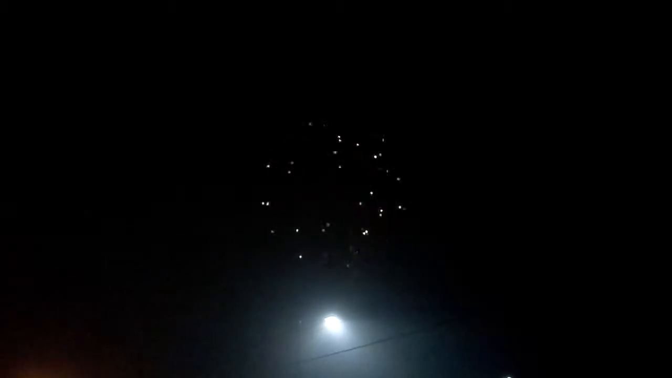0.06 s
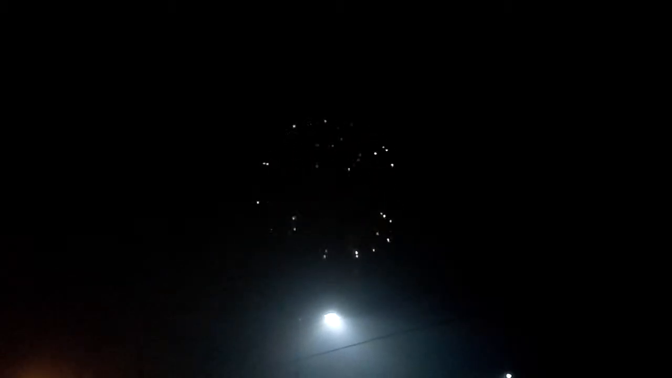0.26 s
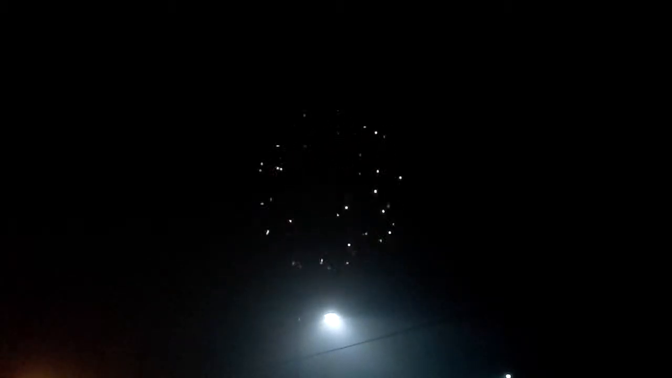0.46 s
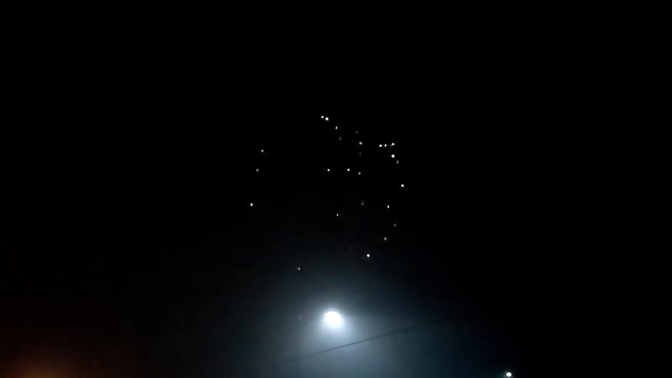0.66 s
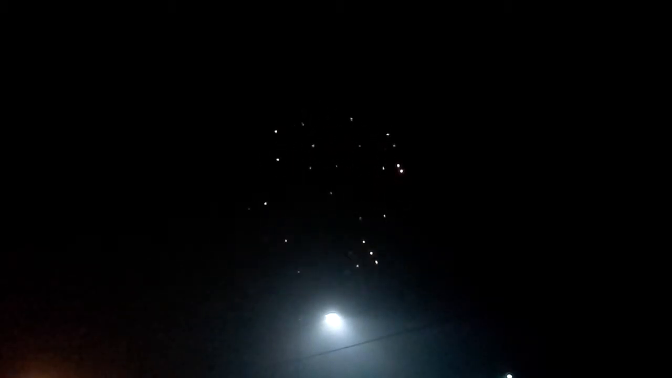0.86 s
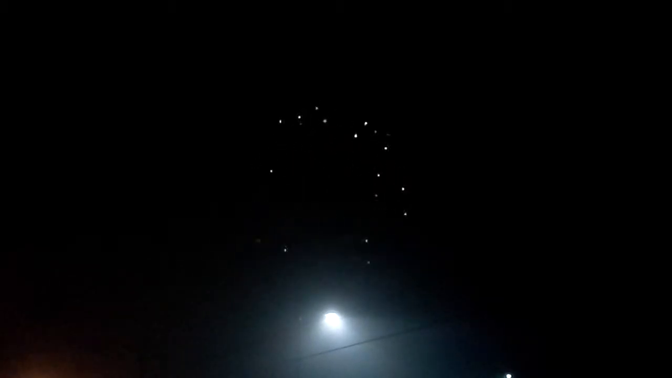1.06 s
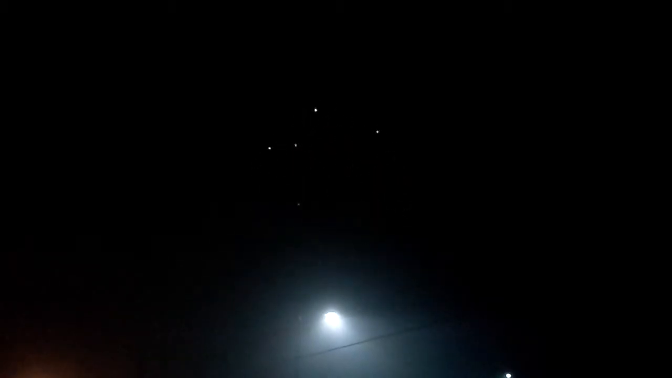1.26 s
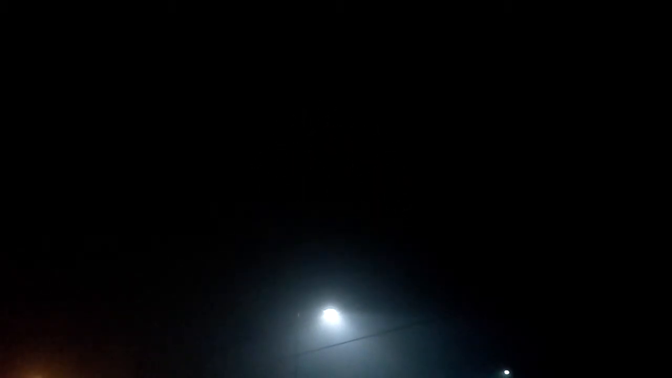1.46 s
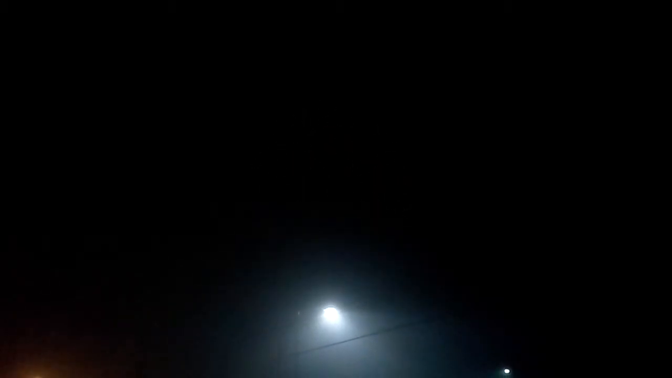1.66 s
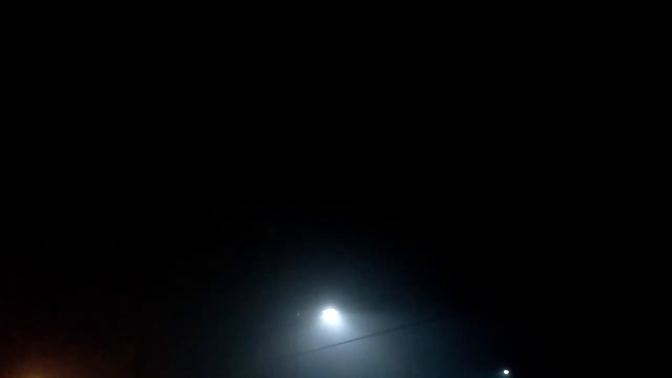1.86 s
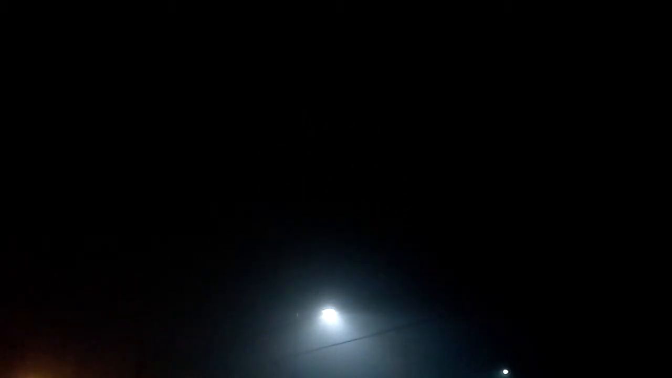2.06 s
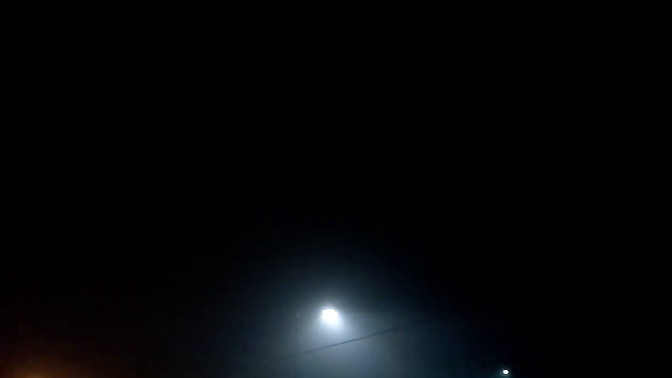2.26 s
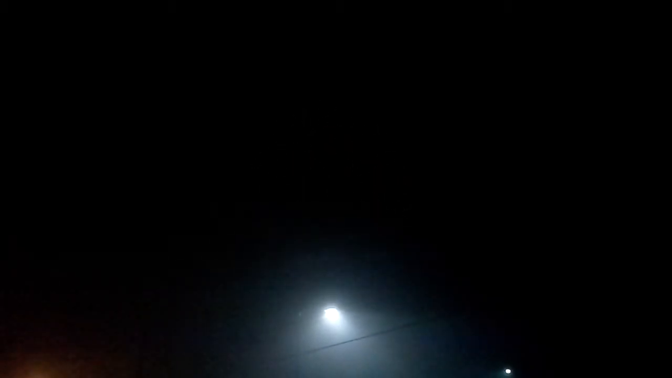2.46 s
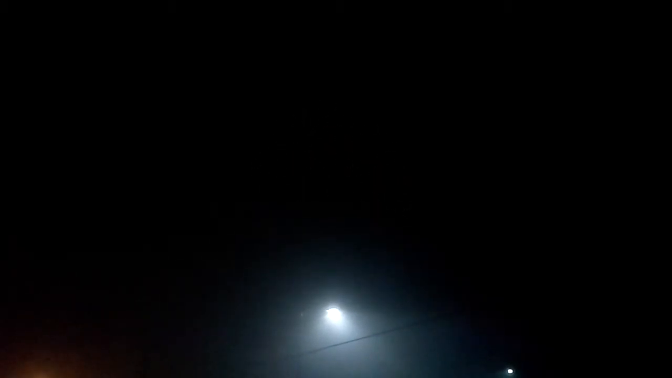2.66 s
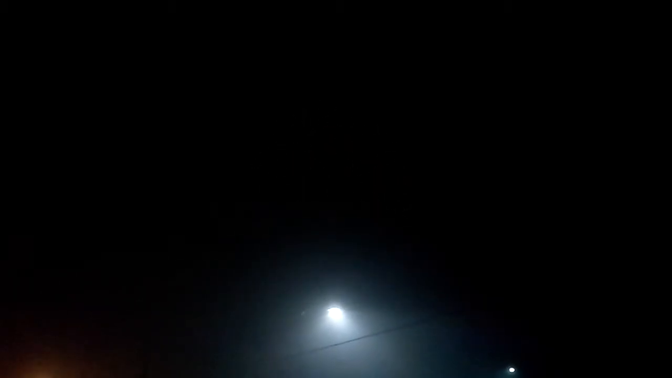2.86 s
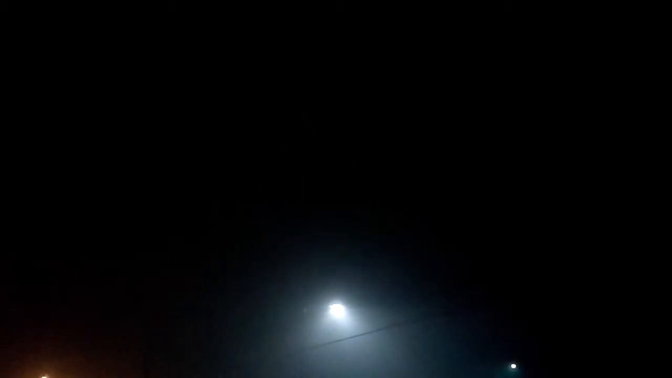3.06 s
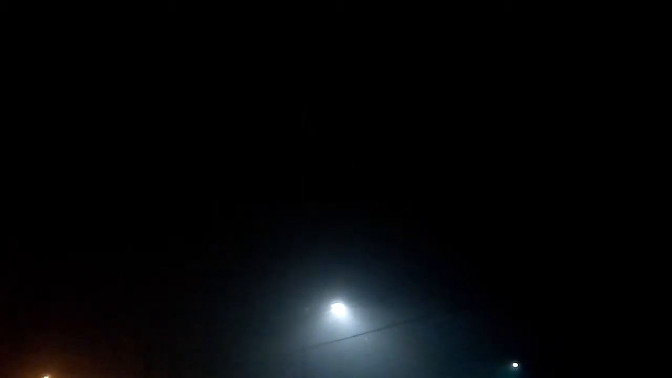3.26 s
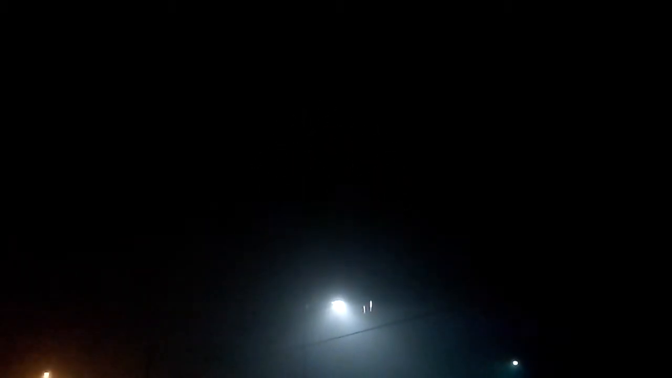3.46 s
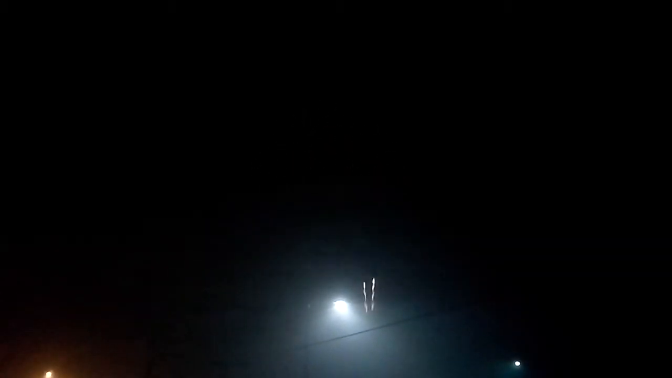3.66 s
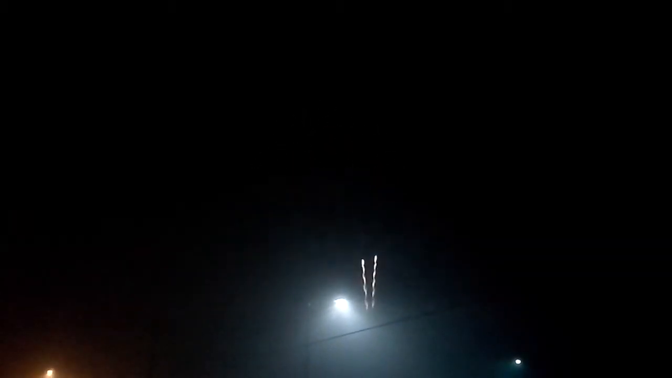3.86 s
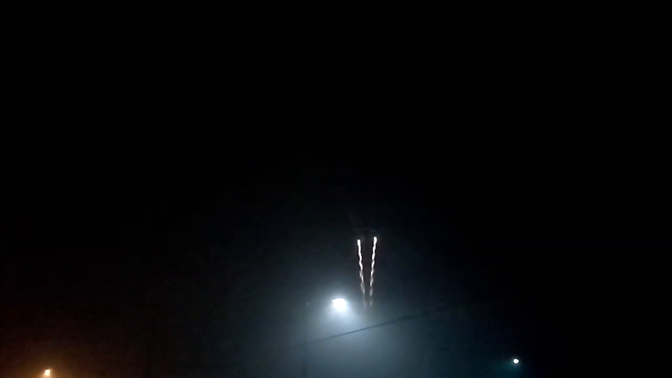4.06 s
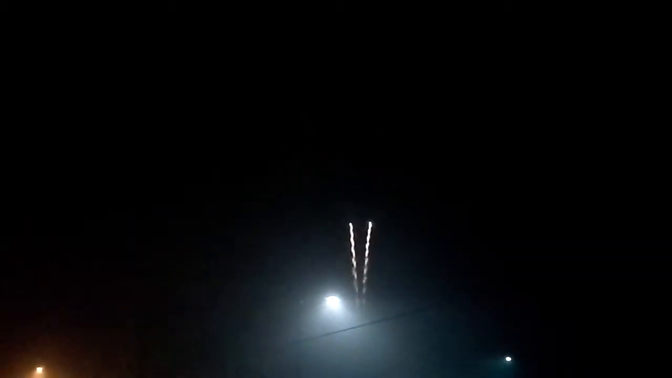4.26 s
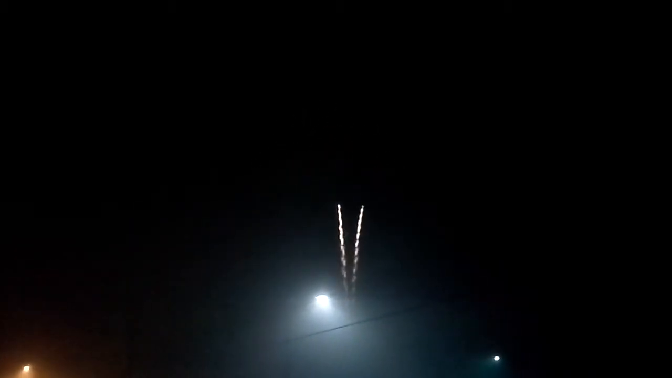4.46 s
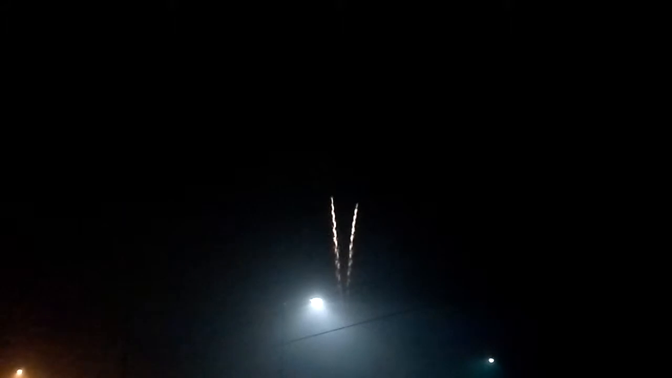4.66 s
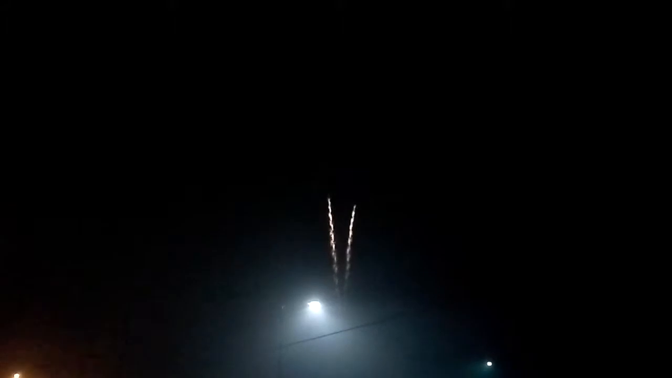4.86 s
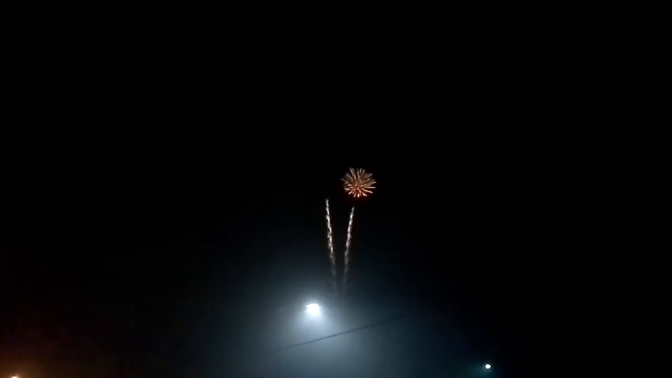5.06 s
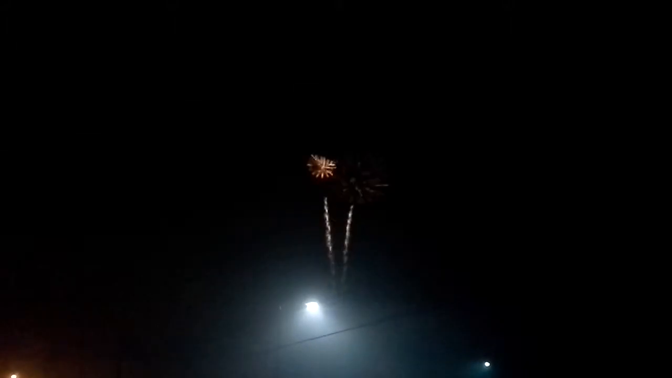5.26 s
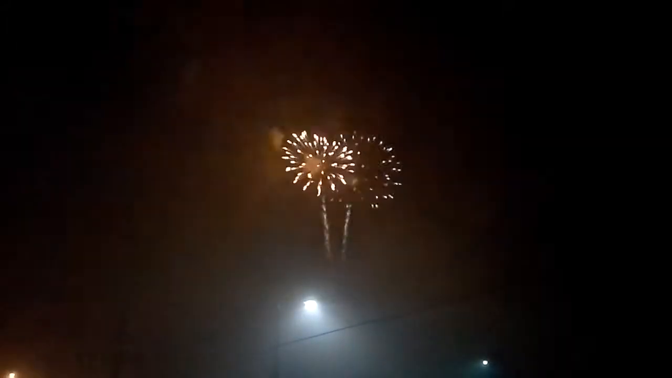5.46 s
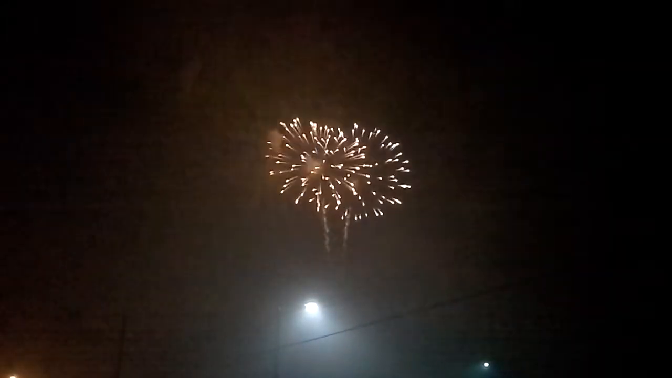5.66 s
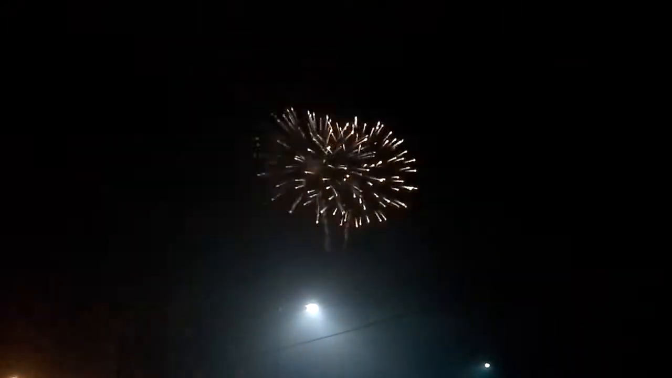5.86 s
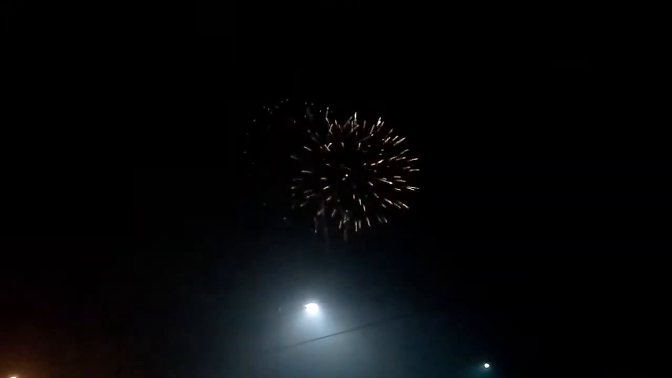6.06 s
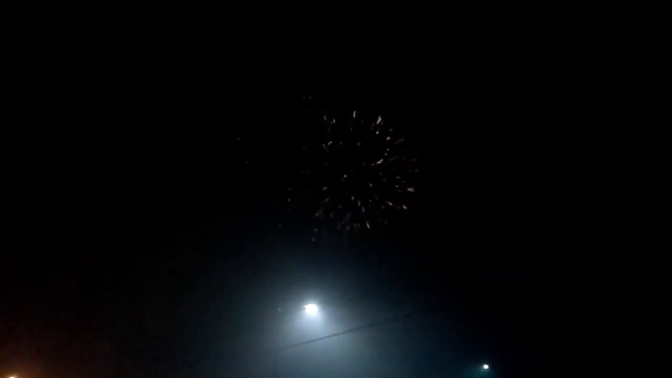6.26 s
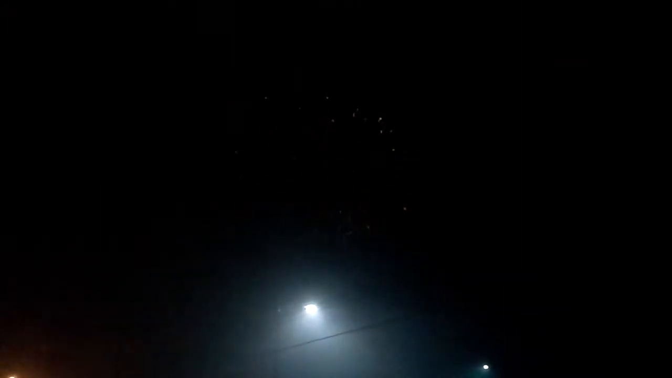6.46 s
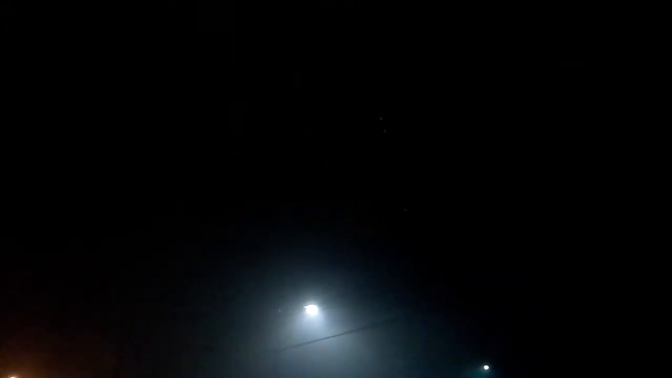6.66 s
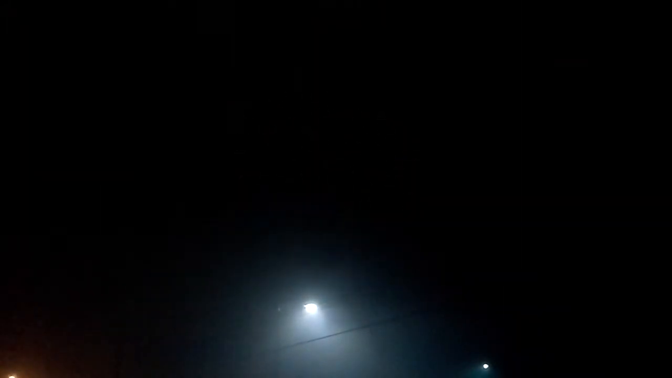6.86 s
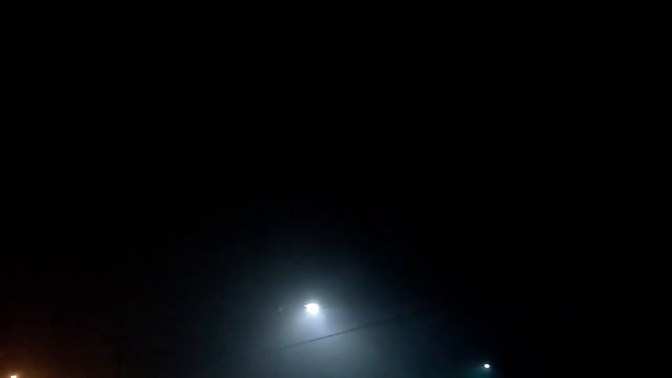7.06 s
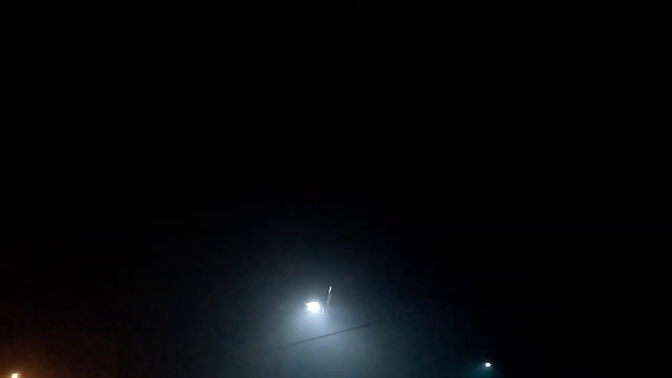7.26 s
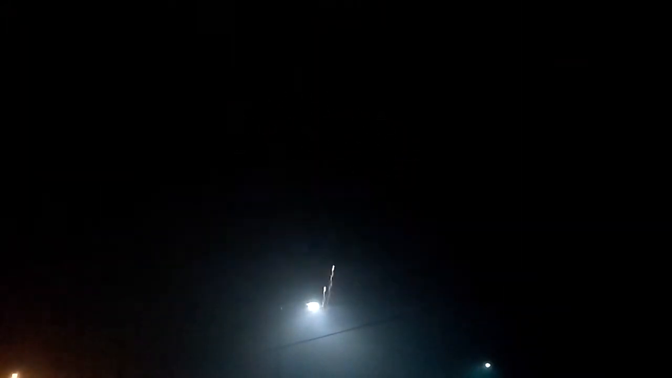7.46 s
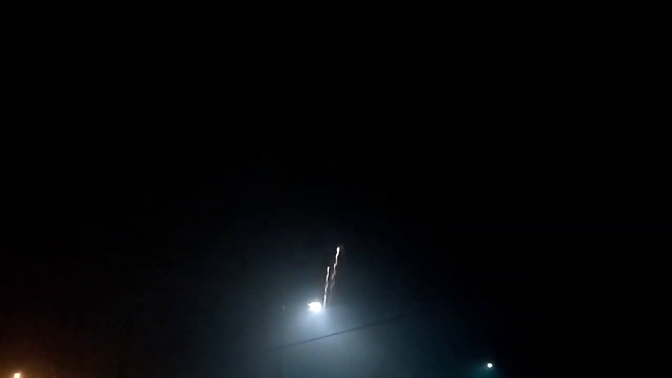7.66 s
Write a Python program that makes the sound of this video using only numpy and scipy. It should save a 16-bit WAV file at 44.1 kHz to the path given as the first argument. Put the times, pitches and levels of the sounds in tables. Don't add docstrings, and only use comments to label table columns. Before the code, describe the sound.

A mono, handheld-like capture of fireworks: first a fading echo tail with slaps from house fronts, then quiet insects and distant traffic. Hollow, woody launch thumps come as a quick pair, with short reflections. After a pause, two very loud, distorted bangs about a quarter second apart swamp everything and roll away in rumbling echoes. Later thumps, one ringing like a tube, punctuate the decay.

```python
import sys
import numpy as np
from scipy import signal
from scipy.fft import rfft, irfft
from scipy.io import wavfile
from scipy.ndimage import uniform_filter1d

SR = 44100
rng = np.random.default_rng(int(sys.argv[2]) if len(sys.argv) > 2 else 0)


def volts(x):
    e = np.asarray(x, float) / 20
    return 10 ** e


def inscribe(sig):
    pcm = np.round(np.clip(np.atleast_2d(sig).T, -1, 1) * 32767)
    wavfile.write(sys.argv[1], SR, pcm.astype(np.int16))


N = 340011
T = np.arange(N) / SR
HZ = np.fft.rfftfreq(N, 1 / SR)

# t/s, shock level/dB, boom level/dB, boom f/Hz
BURSTS = [
    (5.7193, 20, 15, 247),
    (5.9809, 20, 17, 243),
]
# t/s, shock level/dB, tube ring level/dB, overtone level/dB, overtone f/Hz
LAUNCHES = [
    (3.4158, -13, -30, -24, 4600),
    (3.4198, -1, -3, -5, 2930),
    (3.4325, -2, -9, -12, 2220),
    (7.0811, -2, -9, -18, 2200),
    (7.1680, -15, -16, -30, 1400),
    (7.1704, -3.5, 0, -5, 1450),
    (7.6255, -16, -24, -16, 1400),
    (7.6280, -1, -20, -6, 1400),
]
# f/Hz, level/dB per Hz
WALL_COLOUR = [(35, -30), (60, -4), (142, -17), (482, -29), (858, -3), (1370, -5), (1670, -8), (1990, -10),
               (2430, -4.5), (3040, -31), (4630, -38), (9200, -84), (12000, -94), (15600, -115),
               (22000, -120)]
# t/s, peak level/dB, f/Hz, length/cycles
SLAPS = [(0.006, -7, 305, 1.3), (0.242, -18.5, 243, 2), (0.408, -15.5, 307, 3.1), (0.658, -13, 125, 2.7),
         (0.661, -15.5, 406, 3.3), (0.938, -17, 126, 2.1), (1.643, -19, 250, 3), (1.945, -19.5, 275, 3),
         (2.380, -20, 272, 4.5), (2.775, -21.5, 270, 2.6), (3.055, -26, 287, 5.2), (3.790, -30, 4000, 30),
         (3.820, -24, 695, 4.4), (4.130, -25.5, 1640, 13), (4.143, -24, 1600, 10.5), (5.878, -4, 302, 2.3),
         (5.917, -10.5, 253, 2.5), (5.963, -9, 240, 3.2), (5.9765, -1, 270, 1.2), (6.015, -3, 216, 3.7),
         (6.05, -10.5, 225, 8), (6.14, -20.5, 440, 14), (6.165, -11, 209, 7.6), (6.255, -18.5, 202, 6.8),
         (6.34, -20, 246, 13), (4.062, -35, 1990, 14), (4.130, -34, 2380, 21), (4.143, -36, 2390, 12),
         (7.463, -33, 3200, 30), (7.551, -32, 3400, 34)]
ROLL_EDGES_HZ = [150, 450, 1100, 2600]
# f/Hz, level/dB per Hz
ROLL_COLOUR = [(30, -64), (60, -11.5), (126, -2.5), (215, -3.5), (290, 0.5), (430, -12), (510, -12),
               (790, -8.5), (1070, -15), (2000, -20), (3250, -22.5), (4650, -15.5), (6500, -35.5),
               (9500, -49), (15400, -110)]
# f/Hz, level/dB per Hz
TOP_COLOUR = [(4500, -30), (6500, -6), (8000, -7), (13300, -11.5), (15400, -54)]
BAND_HZ = [90, 270, 750, 1700, 4500, 8500]
# near level/dB, near fall/(dB/s), far level/dB, far fall/(dB/s)
SHELL_ECHOES = [
    (-21, 53, -9, 1.5),
    (-1, 43, 1, 0.9),
    (-2.5, 81, 0, 3),
    (-6.5, 81, -2.5, 6),
    (-5.5, 74, -4.5, 8.5),
    (-20, 67.5, -27, 35),
]
# near level/dB, near fall/(dB/s), far level/dB, far fall/(dB/s)
MORTAR_ECHOES = [
    (-14, 67, -9.5, 6.8),
    (-8, 99, -9, 7.1),
    (-1, 135, 0, 13),
    (-6.5, 89, -3.5, 15.8),
    (-2.5, 102, -9.5, 9.3),
    (-34, 85, -29.5, 40),
]
# t/s, near level/dB, far level/dB, extra bass level/dB, extra treble level/dB
SHELL_ROLLS = [
    (-.05, -33, -28, 1.5, 1),
    (5.722, -13.5, -29.5, -4, 3),
    (5.984, -12, -34.5, -1, 1.5),
]
# t/s, near level/dB, far level/dB, extra bass level/dB, extra treble level/dB
MORTAR_ROLLS = [
    (3.421, -19, -31.5, 1.5, -3),
    (7.083, -20.5, -46, 6, -7.5),
    (7.172, -23, -32.5, -1, -6),
    (7.63, -27.5, -34, 0, -6),
]
# t/s, half length/s, level/dB, centre f/Hz
SWELLS = [(-0.002, 0.048, -22, 800), (.35, 0.45, -33.5, 90), (.72, 0.058, -27, 110),
          (0.696, 0.091, -27.5, 450), (.42, 0.054, -30, 1090), (0.777, 0.043, -33.5, 2200),
          (3.412, 0.016, -34, 2520), (3.666, 0.042, -34, 100), (3.69, .03, -35, 1100),
          (3.803, 0.034, -35, 3000), (3.814, 0.04, -32, 750), (3.943, 0.054, -35, 270),
          (4.066, 0.015, -48, 2000), (4.157, 0.13, -50, 1700), (5.806, 0.049, -30, 131),
          (5.883, 0.065, -26, 4500), (6.115, 0.039, -34, 4500), (6.556, 0.046, -37, 900),
          (6.893, 0.067, -32.5, 330), (7.27, 0.045, -31, 750), (7.455, 0.15, -36, 895),
          (5.802, 0.036, -21, 270), (6.17, 0.027, -28, 330)]
# t/s, level/dB
CRICKET = [
    (0, -46),
    (.7, -45.5),
    (1.1, -46),
    (2.4, -44.5),
    (4.2, -45.5),
    (4.9, -47.5),
    (5.7, -47.5),
    (6.6, -46),
    (7.71, -46),
]
# start t/s, length/s, level/dB, depth of gaps between syllables/dB
KATYDID = [(1.012, 0.31, -49.5, -7), (1.5, 0.45, -45, 16), (1.94, 0.18, -48, 8), (2.147, .3, -43.5, 20),
           (2.573, .31, -52, 12), (2.973, 0.28, -48.5, -2), (3.254, 0.2, -43, 2), (4.202, .3, -45.5, 13),
           (4.74, .3, -52, 9), (5.063, 0.2, -46, 10), (5.278, 0.28, -45, 1), (5.57, 0.11, -45.5, 3)]
# f/Hz, width/Hz, level/dB
KATYDID_BODY = [(4150, 230, -9.5), (4453, 390, -2.5), (4650, 120, -2.5)]
# f/Hz, level/dB per Hz
NIGHT_COLOUR = [(24, -35), (60, -13), (250, -1.5), (400, -15), (840, -15.5), (2000, -23.5), (3300, -25),
                (5000, -23), (7000, -31.5), (14300, -29), (15000, -46)]
# f/Hz, width/Hz, level/dB
CHORUS = [(5690, 300, -51), (5893, 230, -52), (8970, 570, -64)]
# f/Hz, level/dB
LOSS_BELOW_MIDDLE = [(6200, -28), (7100, -4.5), (9000, 2.5), (14300, 1.5), (15000, 4)]
# f/Hz, level/dB
LOSS_BELOW_NEIGHBOURS = [(6300, -20), (7300, 1), (9000, 0), (10000, 3)]


def evened(x):
    return x / np.sqrt(np.mean(x ** 2) + 1e-20)


def read(points, hz):
    f, value = np.transpose(points)
    return np.interp(np.log(hz + 1), np.log(f + 1), value)


def add(mix, s, sound):
    part = mix[round(s * SR):][:len(sound)]
    part += sound[:len(part)]


def resonate(x, hz, width):
    turn = np.exp(2j * np.pi * hz * np.arange(len(x)) / SR)
    r = np.exp(-np.pi * width / SR)
    smooth = signal.lfilter([(1 - r) ** 2], [1, -2 * r, r * r], x / turn)
    return 2 * (turn * smooth).real


def wander(seconds):
    size = max(round(seconds * SR), 2)
    drift = uniform_filter1d(rng.standard_normal(N), size)
    return evened(uniform_filter1d(drift, size))


def shock(t, seconds):
    u = t / seconds
    return (1 - u) * np.exp(-u) * np.minimum(t / 0.00005, 1)


def ring(t, hz, t60, rise):
    return np.sin(2 * np.pi * hz * t) * volts(-60 * t / t60) * (1 - np.exp(-t / rise))


def burst(shock_db, boom_db, hz):
    t = np.arange(round(.08 * SR)) / SR
    crack = shock(t, .0006)
    add(crack, .0015, 1.0 * shock(t, .00025))
    add(crack, .0018, .9 * shock(t, .00012))
    turns = np.maximum(hz * t + .07 - 1.3 * np.exp(-t / .0014), 0)
    boom = -np.sin(2 * np.pi * turns) * volts(-20 * (t / .013) ** 3)
    return volts(shock_db) * crack + volts(boom_db) * boom


def launch(shock_db, tube_db, over_db, over_hz):
    t = np.arange(round(.15 * SR)) / SR
    walls_db = shock_db - 11.5
    taps = rng.standard_normal((2, len(t))) * (rng.random((2, len(t))) < 9000 / SR)
    colour = volts(read(WALL_COLOUR, np.fft.rfftfreq(len(t), 1 / SR)))
    walls = evened(irfft(rfft(taps[0]) * colour, len(t)))
    walls *= volts(-60 * t / 0.11) * np.minimum(t / 0.00067, 1)
    late = evened(resonate(taps[1], 4430, 1100)) * volts(-60 * t / 0.085)
    pulse = np.convolve(shock(t, .0003), np.hanning(16))[:len(t)]
    out = volts(shock_db) * pulse / pulse.max() + volts(walls_db) * walls
    out += volts(tube_db) * ring(t, 775, .034, .0006)
    out += volts(over_db) * ring(t, over_hz, .028, .0003)
    add(out, .003, volts(walls_db + 12.5) * ring(t, 113.0, 0.022, 0.0017))
    add(out, .006, volts(walls_db - 10.5) * late)
    return out


def slap(db, hz, cycles):
    t = np.arange(round(cycles / hz * SR)) / SR
    return volts(db) * np.sin(2 * np.pi * hz * t) * np.hanning(len(t))


def echo_levels():
    rise_s, far_sag_db, swell_db_per_octave = 0.004, 0.554, 7
    t = T[::64]
    power = np.zeros((len(BAND_HZ), len(t)))
    for rolls, echoes in ((SHELL_ROLLS, SHELL_ECHOES), (MORTAR_ROLLS, MORTAR_ECHOES)):
        near, near_fall, far, far_fall = np.transpose(echoes)[:, :, None]
        for s, near_db, far_db, bass_db, treble_db in rolls:
            age = np.maximum(t - s, 0)
            tone_db = np.array([bass_db, 0, 0, 0, treble_db, treble_db])[:, None]
            near_power = volts(near_db + near - near_fall * age) ** 2
            far_power = volts(far_db + far - far_fall * age - far_sag_db * age ** 2) ** 2
            power += (near_power + far_power) * (volts(tone_db) * np.minimum(age / rise_s, 1)) ** 2
    for s, half, db, hz in SWELLS:
        octaves_off = abs(np.log2(np.array(BAND_HZ) / hz))[:-1, None]
        swell = np.exp(-((t - s) / half) ** 2)
        power[:-1] += volts(db - swell_db_per_octave * octaves_off) ** 2 * swell
    return [np.interp(T, t, np.sqrt(p)) for p in power]


def roll():
    sizes = volts(1.5 * np.minimum(rng.exponential(1, N), 4))
    echoes = rng.standard_normal(N) * sizes * (rng.random(N) < 12000 / SR)
    spectrum = rfft(echoes * volts(.5 * wander(0.012)))
    band_of = np.searchsorted(ROLL_EDGES_HZ, HZ)
    colour = volts(read(ROLL_COLOUR, HZ))
    colours = [colour * (band_of == k) for k in range(len(ROLL_EDGES_HZ) + 1)]
    colours.append(volts(read(TOP_COLOUR, HZ)))
    return sum(level * evened(irfft(spectrum * band, N)) for level, band in zip(echo_levels(), colours))


def cricket():
    tone_hz, strokes_per_s = 2815, 59.1
    strokes = T * strokes_per_s + 1.03 + 0.027 * wander(0.22)
    within = strokes % 1
    slip = np.cumsum(rng.standard_normal(600))[np.abs(strokes).astype(int)] * 1.59
    tone = np.sin(2 * np.pi * tone_hz * T + slip - 6.0 * within ** 2)
    song = tone * np.sin(np.pi * np.minimum(within / .7, 1))
    garden = rng.standard_normal(4000) * volts(-60 * np.arange(4000) / SR / 0.12)
    song = evened(song) + volts(-6.5) * evened(signal.oaconvolve(song, garden)[:N])
    level_db = np.interp(T, *np.transpose(CRICKET)) + 1 * wander(0.0023)
    return volts(level_db) * evened(song)


def katydid():
    syllable_s, sounding, swell_db = .114, 0.65, 3.5
    teeth = np.cumsum(430 * volts(0.79 * wander(0.0044))) / SR
    clicks = np.diff(np.floor(teeth), prepend=0) * (1 + 0.28 * rng.standard_normal(N))
    clicks += 0.072 * rng.standard_normal(N)
    rasp = evened(sum(volts(db) * resonate(clicks, hz, width) for hz, width, db in KATYDID_BODY))
    level = np.zeros(N)
    for start, length, db, gap_db in KATYDID:
        stroke = np.arange(0, length, 1 / SR) / syllable_s % 1
        growth_db = swell_db * (stroke / sounding - .5)
        add(level, start, volts(db + np.where(stroke < sounding, growth_db, -gap_db)))
    return uniform_filter1d(level, size=1200) * rasp


def night():
    air = evened(irfft(rfft(rng.standard_normal(N)) * volts(read(NIGHT_COLOUR, HZ)), N))
    out = volts(-43.5) * air
    for hz, width, db in CHORUS:
        shimmer_db = 1 * wander(0.011) + 1.0 * wander(0.05)
        out += volts(db + shimmer_db) * evened(resonate(rng.standard_normal(N), hz, width))
    return out


def scene():
    bangs = np.zeros(N)
    for table, source, lead in ((BURSTS, burst, 0), (LAUNCHES, launch, .0003), (SLAPS, slap, .004)):
        for s, *row in table:
            add(bangs, s - lead, source(*row))
    mono = bangs + roll() + cricket() + katydid() + night()
    return np.array([mono, mono])


def thin_treble(x):
    hz, t, z = signal.stft(x, SR, nperseg=2048)
    power = abs(z) ** 2
    line_db = 10 * np.log10(power + 1e-20)
    middle_db = 10 * np.log10(power[(hz > 500) & (hz < 5000)].sum(0) + 1e-20)
    step_db = np.clip(-82.0 + 1.22 * (uniform_filter1d(middle_db, size=3) + 35), -87, -63)
    step_db = step_db + read(LOSS_BELOW_MIDDLE, hz)[:, None]
    step_db += 2.5 * rng.standard_normal((len(t), 40)).T[(hz / 600).astype(int)]
    around_db = 10 * np.log10(uniform_filter1d(power, size=24, axis=0) + 1e-20)
    step_db = np.maximum(step_db, around_db + read(LOSS_BELOW_NEIGHBOURS, hz)[:, None])
    steady = np.diff(middle_db, prepend=0) < 9
    lost = (line_db < step_db) & (hz[:, None] > 5500) & steady
    return x - signal.istft(z * lost, SR, nperseg=2048)[1][:N]


def roll_off(x):
    return signal.sosfilt(signal.butter(12, 15590, fs=SR, output="sos"), x)


def record(dry):
    capsule = signal.lfilter(*signal.butter(2, 50, "high", fs=SR), dry[0])
    clipped = np.clip(capsule, -.99, .99)
    kept = thin_treble(clipped)
    return roll_off(np.array([kept, kept]))


dry = scene()
out = record(dry)
inscribe(out)
```